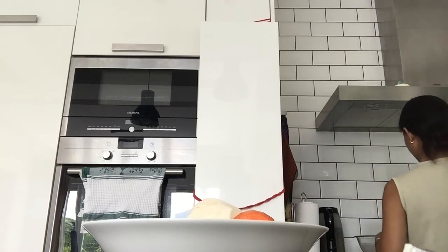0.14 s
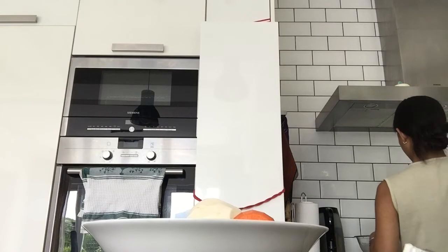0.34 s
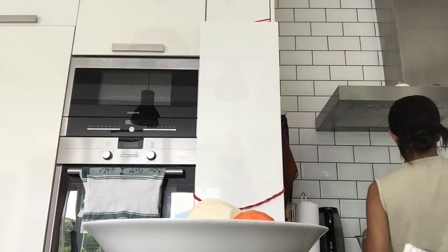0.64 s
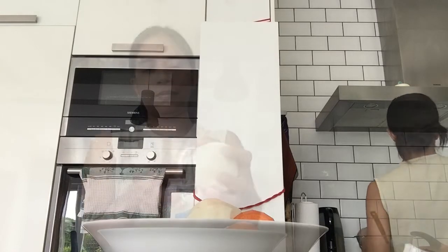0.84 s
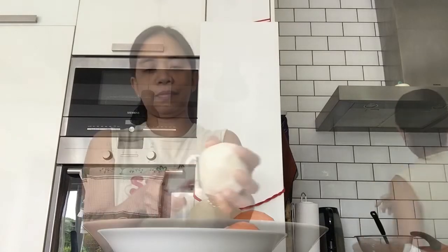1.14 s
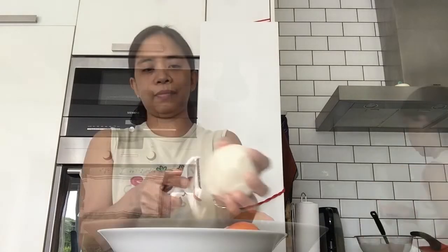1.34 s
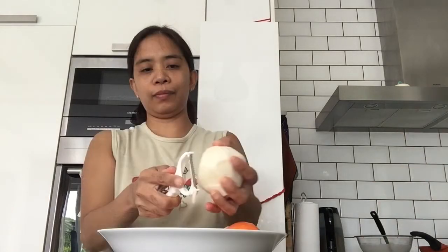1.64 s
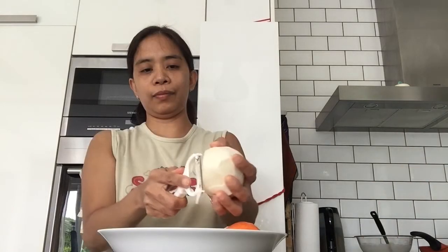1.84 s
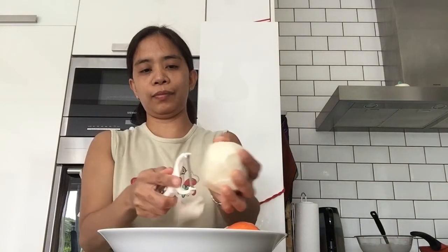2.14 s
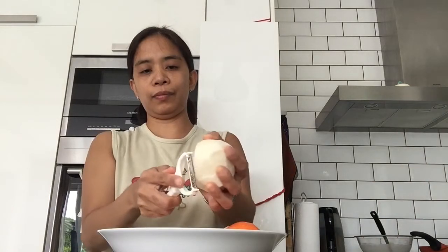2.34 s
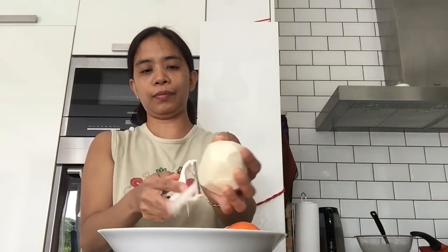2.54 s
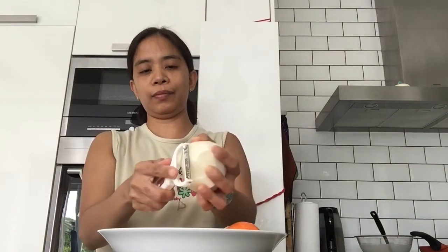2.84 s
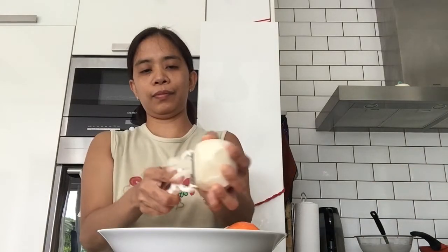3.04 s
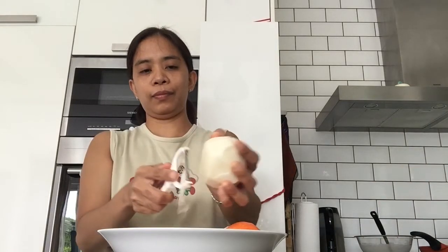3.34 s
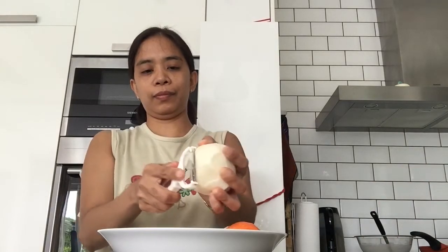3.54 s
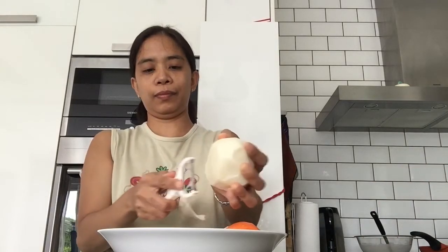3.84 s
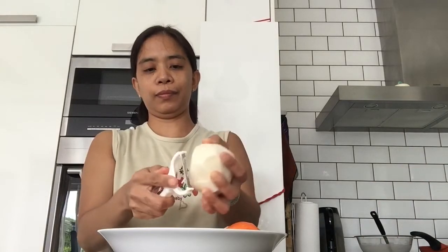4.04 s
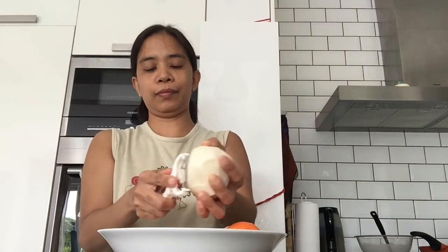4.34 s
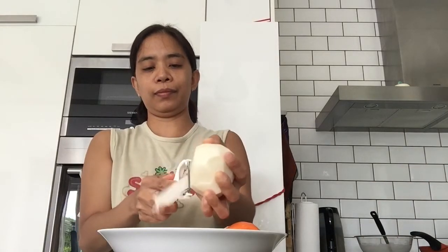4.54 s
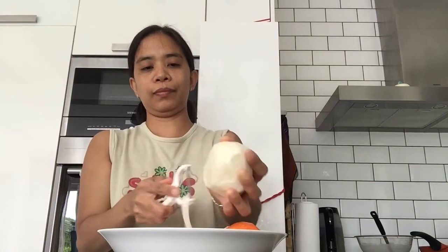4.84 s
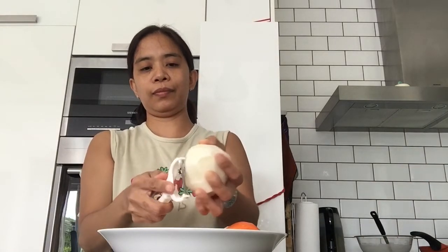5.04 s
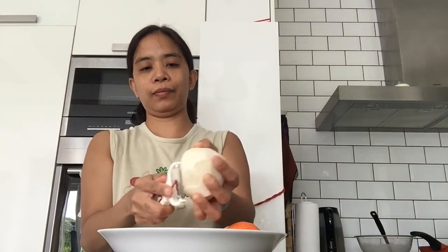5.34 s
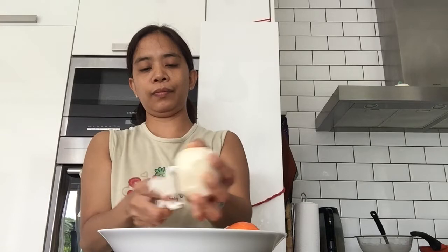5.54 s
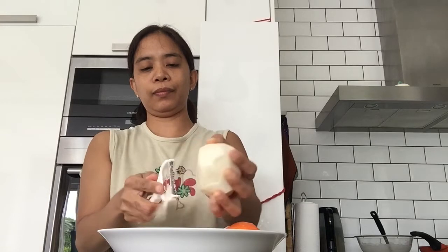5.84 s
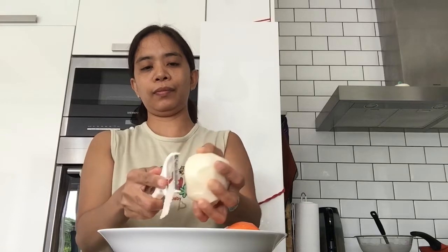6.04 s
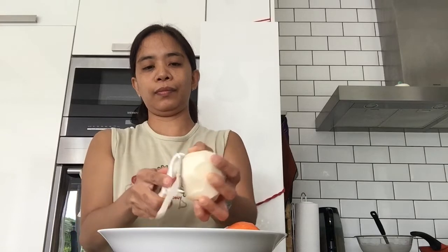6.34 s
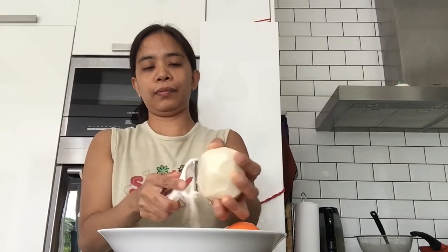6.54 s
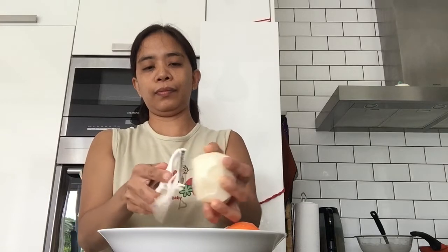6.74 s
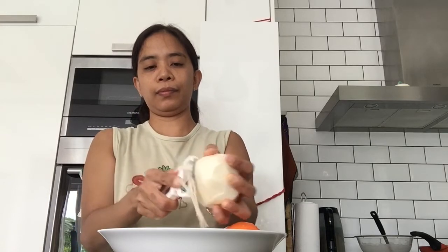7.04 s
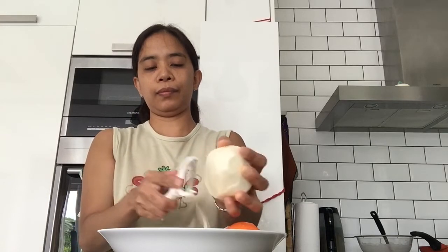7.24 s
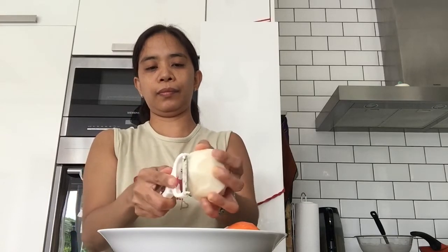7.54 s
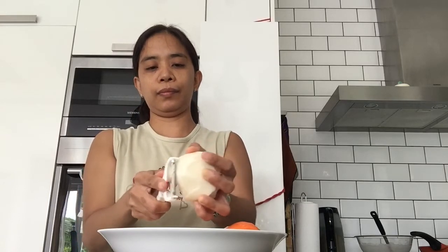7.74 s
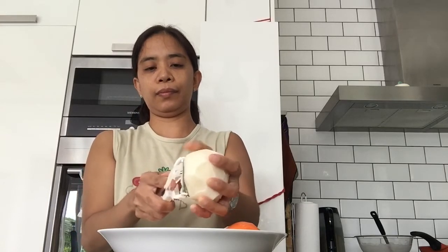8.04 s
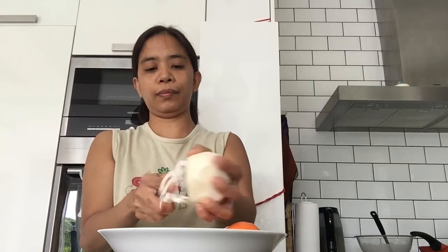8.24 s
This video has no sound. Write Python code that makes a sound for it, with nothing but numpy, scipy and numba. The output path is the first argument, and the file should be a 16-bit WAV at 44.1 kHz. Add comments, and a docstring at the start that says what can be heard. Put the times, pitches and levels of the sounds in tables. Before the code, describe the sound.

A quiet appliance hum with low drones and soft air noise runs throughout, its deep motor tone faint at first and fuller later. At about 0.25 s a pan is knocked at the far counter, a short dull clank with a ringing tail; near 0.77 s a pot gives a brighter double clatter, settling with a small bump by 0.93 s. From 1.1 s a swivel peeler works close by on a raw root vegetable over a bowl: two weaker scrapes, then fuller strokes around 1.8, 2.3, 3.0, 3.5, 4.2, 4.5, 5.2, 5.6, 6.4, 7.0, 7.8 and 8.3 s. Each is a crisp, wet, grainy rasp of about 0.1 to 0.3 s, coloured by the hollow hand. Sharp blade ticks precede many strokes, strongest at 1.8 s; a tiny metallic ring sounds near 3.4 s. Single close microphone, live tiled room, identical channels.

```python
"""Metal cookware is knocked twice at the far counter of a tiled kitchen: ringing modes over a dull clatter.
Then a swivel peeler takes short strokes off a raw root vegetable held over a bowl. The blade ticks (noise
bursts through resonances), then tears the wet flesh: random grains hiss and ring in the hollow of the hand.
An appliance hums throughout: a motor tone, filtered-noise drones and broad air noise."""
import sys
import numpy as np
from scipy import signal
from scipy.fft import rfft, irfft
from scipy.io import wavfile
from numba import njit

SR = 44100
rng = np.random.default_rng(int(sys.argv[2]) if len(sys.argv) > 2 else 0)


def ratio(d):
    """dB to gain"""
    e = np.asarray(d, float) / 20
    return 10 ** e


def dump(signal):
    """Clip the signal to [-1, 1] and save it as 16-bit WAV at the path in sys.argv[1]."""
    limited = np.clip(np.atleast_2d(signal).T, -1, 1)
    pcm = np.round(limited * 32767).astype(np.int16)
    wavfile.write(sys.argv[1], SR, pcm)


N = 369999

# Resonances that root and peeler frame add to the tearing.
# Each row: centre in Hz, width in Hz, relative level in dB.
BODY_PEAKS = [(1782, 870, -3.5), (3350, 1720, 2), (4050, 1390, 3.5), (6270, 1430, -1), (7734, 1440, -5),
              (9130, 1100, -9)]
# Treble resonances of the tearing.
# Each row: centre in Hz, width in Hz, relative level in dB.
SHEEN_PEAKS = [(11800, 3350, -4.5), (15150, 1940, -3)]
# The hands over the bowl.
# Each row: time in seconds, hollow in Hz, hollow over cutting in dB, bowl echo comb at the bite in Hz.
HAND_PATH = [(1.16, 1720, -6, 1370), (1.36, 1870, 2, 1360), (1.95, 1670, -6, 1260), (2.36, 1910, 3.5, 1294),
             (2.5, 1690, -6.5, 1230), (3.0, 1730, -11.5, 1310), (3.2, 1656, -5.5, 1340),
             (3.68, 1740, -11, 1250), (3.83, 1710, 0, 1320), (4.27, 1840, -3, 1300),
             (4.37, 1700, -5.5, 1300), (4.57, 1440, -20, 1440), (4.8, 1790, -12, 1420),
             (5.3, 1820, -22, 1300), (5.64, 1420, -13.5, 1420), (6.28, 1680, -10, 1425),
             (6.49, 1790, -7.5, 1350), (7.13, 1940, -14, 1237), (7.6, 2050, -4, 1330),
             (7.88, 1800, -13, 1350), (8.31, 1720, -22, 1480), (8.39, 1690, 6, 1450)]


def strokes():
    """The tearing drives body, hollow, rasp and sheen under the force of each stroke."""
    hollow_hz, hollow_db, _ = in_time(HAND_PATH)
    sharp_hz, settle_s = 158, 0.02   # the hollow starts sharp and settles as the grip closes
    hollow_hz = hollow_hz + sharp_hz * np.exp(-since_bite() / settle_s)
    hollow_width_hz = 110
    grains = tearing(per_s=6000, spread_db=1.0)

    uneven_db, uneven_hz = 1.1, 14.2   # uneven flesh: every body resonance swells and sinks on its own
    body = 0
    for k, peak in enumerate(BODY_PEAKS):
        swell = ratio(uneven_db * drift(uneven_hz))
        body = body + (-1) ** k * swell * resonances(grains, [peak])
    body = rms_one(body)
    rasp = rms_one(band(grains, 882, 1437))
    sheen = rms_one(resonances(grains, SHEEN_PEAKS))
    radius = np.exp(-np.pi * hollow_width_hz / SR)
    hollow = rms_one(gliding_resonance(grains, 2 * np.pi * hollow_hz / SR, radius))

    rasp_db = -16.5 - 0.46 * hollow_db   # over cutting; a looser cup lets more rasp out
    sheen_db = -5.5   # over cutting
    cutting = stroke_force(lift_db_per_s=600, grows_db_per_s=0) + skids()
    open_air = cutting * (body + ratio(rasp_db) * rasp + ratio(sheen_db) * sheen)
    # the hollow gains on the cutting along the stroke and outlasts it
    hollow_force = stroke_force(lift_db_per_s=235, grows_db_per_s=5)
    return open_air, hollow_force * ratio(hollow_db) * hollow


def tearing(per_s, spread_db):
    """Cells of the flesh burst at random, with exponential size spread in dB and a wavering strength."""
    sizes = ratio(spread_db * np.minimum(rng.exponential(1, N), 4)) * rng.choice([-1, 1], N)
    bursts = rng.random(N) < per_s / SR
    return sizes * bursts * ratio(0.5 * drift(50))


# Peeling strokes.
# Each row: bite in seconds, swell in seconds, fade in seconds, cutting at its height in dB,
# softening at the bite in dB.
PEEL_STROKES = [(1.083, 0.073, .09, -49, 10.5), (1.31, 0.024, .025, -55.5, 10),
                (1.803, .2, 0.082, -45, 8.5), (2.334, 0.16, 0.12, -45.5, 11.5),
                (2.918, 0.037, 0.019, -57.5, 13), (2.968, 0.073, 0.2, -44.5, 4),
                (3.514, 0.17, 0.15, -45, 13.5), (4.23, 0.1, 0.033, -48.5, 19.5),
                (4.503, 0.073, 0.047, -42.5, 9.5), (4.765, .03, 0.018, -48, 15),
                (5.19, .03, .021, -67.5, 0), (5.236, 0.083, 0.033, -49.5, 6), (5.567, 0.03, .13, -43, 10.5),
                (6.219, 0.069, 0.015, -52.5, 24), (6.389, 0.065, 0.14, -44, 7.5),
                (6.957, 0.21, 0.072, -48, 10.5), (7.543, 0.025, 0.1, -61, 1),
                (7.695, 0.014, .015, -57.5, 7), (7.828, 0.047, 0.066, -44.5, 5.5),
                (8.286, 0.036, 0.07, -44.5, 16)]


def stroke_force(lift_db_per_s, grows_db_per_s):
    """Each stroke leads in faintly, bites, swells to its height, fades and lifts off; a gain over time."""
    bite_db_per_s = 2500
    lead_in_db, lead_in_db_per_s = -15.5, 250   # a faint lead-in rises just before the bite: level under it, rise
    fade_db = 10.5   # loss before the lift
    t, power = np.arange(N) / SR, np.zeros(N)
    for s, swell_s, fade_s, db, soft_db in PEEL_STROKES:
        span = slice(int((s - .1) * SR), int((s + 1) * SR))
        u = t[span] - s
        early = np.minimum(u, 0)
        onset_db = np.maximum(bite_db_per_s * early, lead_in_db + lead_in_db_per_s * early)
        swell_db = -soft_db * np.clip(1 - u / swell_s, 0, 1) ** 2
        fading_db = -fade_db * np.clip((u - swell_s) / fade_s, 0, 1) ** 2
        growth_db = grows_db_per_s * (np.clip(u, 0, swell_s + fade_s) - swell_s)
        lift_db = -lift_db_per_s * np.maximum(u - swell_s - fade_s, 0)
        power[span] += ratio(2 * (db + onset_db + swell_db + fading_db + growth_db + lift_db))
    return np.sqrt(power)


def since_bite():
    """Seconds since the blade last bit, or since the start before the first bite."""
    t, bites = np.arange(N) / SR, np.array([0, *(row[0] for row in PEEL_STROKES)])
    return t - bites[np.searchsorted(bites, t, side="right") - 1]


# Blade ticks.
# Each row: time in seconds, level in dB, centre in Hz, sheen peak over the tick's own in dB.
BLADE_TICKS = [(1.6252, -46, 5530, -43), (1.7984, -36, 6870, -23), (1.804, -44, 2000, 0),
               (1.8088, -18, 6140, -16), (1.8204, -52, 7200, -24), (1.8226, -45, 7100, -19),
               (2.3381, -28.5, 3600, -25), (2.8887, -31.5, 3250, -5), (2.902, -38, 3300, -15),
               (3.411, -51, 8700, -12), (3.5009, -31.5, 3200, -15), (3.511, -30, 3740, -14),
               (3.8303, -40.5, 3730, -23), (4.149, -54.5, 3060, -26), (4.185, -56, 3300, -19),
               (5.1338, -41.5, 2800, -32), (5.1462, -42.5, 3300, -30), (5.1846, -54, 4360, -15),
               (5.475, -53, 4500, -5), (6.1807, -39.5, 2920, -22), (6.2035, -27, 4360, -10),
               (6.9054, -37.5, 2730, -29), (7.5205, -29.5, 2860, -25), (7.5353, -27.5, 4200, -6),
               (7.7097, -43, 2170, -17), (8.2003, -42.5, 2630, -39)]
# Peeler frame under a tick.
# Each row: centre in Hz, width in Hz, relative level in dB.
FRAME_PEAKS = [(1264, 63, -2), (3030, 124, 4.5), (3220, 70, 3.5), (4200, 570, -1), (5600, 450, -1.5),
               (7010, 220, 0)]


def ticks():
    """The blade snaps on its pivot: a few milliseconds of rattle, coloured by frame and body."""
    frame_db, body_db = -2.5, -10   # under each tick's own colour
    rise_s, decay_s = 0.00086, 0.00054
    out, t = np.zeros(N), np.arange(600) / SR
    noise = rng.standard_normal((len(BLADE_TICKS), 600))
    for (s, db, hz, sheen_db), snap in zip(BLADE_TICKS, noise):
        snap = snap * np.exp(-t / decay_s) * np.minimum(t / rise_s, 1)
        tick = resonances(snap, [(hz, 900, 0.0)])
        tick = tick + ratio(frame_db) * resonances(snap, FRAME_PEAKS)
        tick = tick + ratio(body_db) * resonances(snap, BODY_PEAKS)
        sheen = resonances(snap, SHEEN_PEAKS)
        tick = tick / np.abs(tick).max() + ratio(sheen_db) * sheen / np.abs(sheen).max()
        at = int(s * SR)
        out[at:at + 600] += ratio(db) * tick
    return out


def skids():
    """The blade slides briefly after each tick; a gain over time that decays exponentially."""
    skid_db, fall_db_per_s = -26, 600   # level over the tick's, fall
    kicks = np.full(N, 1e-18)
    for s, db, *_ in BLADE_TICKS:
        kicks[int(s * SR)] = ratio(db + skid_db)
    return signal.lfilter([1], [1, -ratio(-fall_db_per_s / SR)], kicks)


# Modes of the loose blade.
# Each row: pitch in Hz, relative level in dB, t60 in seconds.
BLADE_MODES = [(2075, -3, .6), (2853, -2, .6), (8790, 2, .06), (9545, 2, .08)]
# Taps on the loose blade.
# Each row: time in seconds, relative level in dB.
LOOSE_TAPS = [(3.407, -65.5), (7.55, -77)]


def loose_blade():
    """The tapped blade rings in a few decaying modes."""
    return struck(BLADE_MODES, LOOSE_TAPS, split=0.00074)


def bowl_echo(x):
    """Sound bounces between bowl and hands: two band-limited copies, one and two path lengths late."""
    echo_share, second_share = 0.52, 0.35
    widen_hz_per_s = 1190   # the comb widens as the blade travels down
    comb_hz = in_time(HAND_PATH)[2] + widen_hz_per_s * np.minimum(since_bite(), .4)
    lag, clock = SR / comb_hz, np.arange(N)
    once = echo_share * band(np.interp(clock - lag, clock, x), 460, 5900)
    return x + once + second_share * np.interp(clock - lag, clock, once)


# Modes of the pan.
# Each row: pitch in Hz, relative level in dB, t60 in seconds.
PAN_MODES = [(282, -9.5, 0.28), (410, -10, 0.13), (716, 6, 0.07), (870, -1, 0.1), (1407, -15.5, 0.51),
             (1841, -34, 0.17), (2470, -3, 0.1), (2450, -22, 0.52), (2620, -11, 0.27), (2930, -7.5, 0.11),
             (3470, -18, 0.12), (3790, -8.5, 0.036)]
# Contacts on the pan.
# Each row: time in seconds, relative level in dB.
PAN_HITS = [(0.2551, -43), (.2655, -77), (.33, -60)]
# Spectrum of the pan's damped modes.
# Each row: frequency in Hz, relative level in dB per Hz.
PAN_SPECTRUM = [(150, -12), (700, 4), (1200, -9), (2500, -10.5), (4200, -11.5), (5500, -29), (8000, -48)]
# Modes of the pot.
# Each row: pitch in Hz, relative level in dB, t60 in seconds.
POT_MODES = [(351.7, -4, 0.49), (698, -3.5, 0.14), (844, -3, 0.2), (1234, -5, 0.11), (1430, -2, 0.24),
             (1640, -5, 0.19), (1900, -33, 0.36), (2610, -21, 0.28), (3250, -6.5, 0.12), (4050, -5, 0.11),
             (4120, -12.5, 0.24), (4387, -18, 0.13), (4500, -11.5, 0.16), (5030, -18, 0.18),
             (5820, -5.5, 0.17), (7800, -17, 0.15), (8960, -12, 0.078), (9400, -9, 0.081),
             (10140, -15, 0.14), (11530, -18, 0.17), (11800, -23, 0.16), (13470, -24, 0.15)]
# Contacts on the pot.
# Each row: time in seconds, relative level in dB.
POT_HITS = [(0.7644, -47.5), (0.782, -50.5), (.845, -63), (0.886, -64), (0.93, -69)]
# Spectrum of the pot's damped modes.
# Each row: frequency in Hz, relative level in dB per Hz.
POT_SPECTRUM = [(150, -8), (500, -2), (1400, 5.5), (3000, -6), (5500, -6), (9000, -28), (12500, -12),
                (15000, -41)]
# A dull bump as the pot settles.
# Each row: time in seconds, relative level in dB.
POT_BUMPS = [(.928, -37)]


def cookware():
    """Ringing modes over the dull noise of many damped ones."""
    thud = coloured(rattle(PAN_HITS, 0.012), PAN_SPECTRUM)
    pan = struck(PAN_MODES, PAN_HITS, split=0.01) + ratio(34.0) * thud
    clatter = coloured(rattle(POT_HITS, 0.02), POT_SPECTRUM)
    pot = struck(POT_MODES, POT_HITS, split=0.0029) + ratio(32.5) * clatter
    bump = band(rattle(POT_BUMPS, 0.0063), 230, 630)
    return pan + pot + ratio(19) * bump


def struck(modes, knocks, split):
    """Every mode is a close pair that beats; each knock meets it in a phase of its own."""
    s, knock_db = np.transpose(knocks)
    out = 0
    for hz, db, t60_s in modes:
        for pitch_hz in hz * (1 - split), hz * (1 + split):
            clicks = np.full(N, 1e-18)
            at = (s * SR + rng.random(len(s)) * SR / hz).astype(int)
            clicks[at] = ratio(knock_db + db - 5.0)
            r, w = ratio(-60 / (t60_s * SR)), 2 * np.pi * pitch_hz / SR
            out = out + signal.lfilter([0, np.sin(w)], [1, -2 * r * np.cos(w), r * r], clicks)
    return out


def rattle(knocks, decay_s):
    """A knock is a short scatter of contacts that dies away."""
    t = np.arange(4000) / SR
    scatter = rng.standard_normal((len(knocks), 4000)) * np.exp(-t / decay_s)
    out = np.full(N, 1e-18)
    for (s, db), burst in zip(knocks, scatter):
        at = int(s * SR)
        out[at:at + 4000] += ratio(db) * burst / np.sqrt(np.sum(burst ** 2))
    return out


# Levels of the low drones: the motor tone is faint for the first second and louder after. Each row: time in
# seconds, motor tone in dB, second-order drone in dB, cabinet drone in dB.
APPLIANCE_LEVELS = [(0.0, -75, -67, -70), (0.89, -78, -65.5, -65.5), (1.24, -67, -69.5, -66),
                    (1.94, -62, -65.5, -59), (2.71, -66, -67.5, -60), (3.62, -60, -65.5, -60),
                    (4.3, -65, -69, -61), (4.55, -66, -79, -58), (5.12, -59.5, -65.5, -64),
                    (5.93, -59, -65.5, -58.5), (7.12, -57, -66, -61.5), (8.39, -60.5, -63.5, -59.5)]
# Cabinet resonances.
# Each row: centre in Hz, width in Hz, relative level in dB.
CABINET_PEAKS = [(70, 12, -4.5), (134.8, 9, 0.5), (168.4, 9.5, 1.5), (205.5, 28.6, -10.5)]
# Air resonances of the duct.
# Each row: centre in Hz, width in Hz, gain on unit noise in dB.
DUCT_PEAKS = [(347.6, 19.2, -45.5), (534, 23, -51)]
# Spectrum of the air noise; the first row is not used.
# Each row: frequency in Hz, relative level in dB per Hz.
AIR_SPECTRUM = [(130, -33), (220, -6), (254, 2.5), (344, 2), (404, -3.5), (435, -2.5), (558, -9.5),
                (680, -6.5), (1270, -12), (6850, -19), (15900, -27.5)]


def appliance():
    """A motor tone, its second order as narrow noise, cabinet and duct resonances and broad air noise."""
    motor_hz = 49
    air_db = -72   # within 274 to 640 Hz
    tone_db, second_db, cabinet_db = in_time(APPLIANCE_LEVELS)
    cabinet_db = cabinet_db + 2.83 * drift(2.34)
    tone_hz = motor_hz * (1 + 0.0031 * drift(2.5))
    tone = np.sqrt(2) * np.sin(2 * np.pi * np.cumsum(tone_hz) / SR)

    shaking = rng.standard_normal(N + SR)   # the first second lets the filters settle
    second = resonances(shaking, [(2 * motor_hz, 9, 0)])
    second = rms_one(resonances(second, [(2 * motor_hz, 14, 0)])[SR:])
    cabinet = resonances(shaking, CABINET_PEAKS)
    high_pass = signal.butter(4, 62, "high", fs=SR, output="sos")
    cabinet = rms_one(signal.sosfilt(high_pass, cabinet)[SR:])
    duct = resonances(shaking, DUCT_PEAKS)[SR:]

    air = coloured(rng.standard_normal(N), [(60, -50), *AIR_SPECTRUM[1:]])
    air = air / np.std(band(air, 274, 640))
    drones = ratio(tone_db) * tone + ratio(second_db) * second + ratio(cabinet_db) * cabinet
    return drones + duct + ratio(air_db) * air


# Reverberation of the kitchen.
# Each row: frequency in Hz, t60 in seconds.
KITCHEN_T60 = [(150, 0.33), (600, 0.26), (2000, 0.4), (5000, 0.27), (10000, 0.42), (15000, 0.26)]


def kitchen(x):
    """Dense reflections from tile and steel: noise bands, each with its own decay."""
    t, tail = np.arange(SR // 2) / SR, 0
    edges_hz = 80 * 2. ** np.arange(9)
    for low_hz, high_hz in zip(edges_hz, edges_hz[1:]):
        decay = ratio(-60 * t / at_hz(KITCHEN_T60, np.sqrt(low_hz * high_hz)))
        noise = band(rng.standard_normal(len(t)), low_hz, high_hz)
        piece = noise * decay * np.minimum(t / 0.0013, 1)
        tail = tail + piece / np.sqrt(np.sum(decay ** 2))
    return signal.fftconvolve(x, tail)[:N]


def rms_one(x):
    """Scales to an rms of 1."""
    return x / np.sqrt(np.mean(x ** 2) + 1e-20)


def in_time(rows):
    """Interpolates table columns linearly over every sample."""
    s, *columns = np.transpose(rows)
    return [np.interp(np.arange(N) / SR, s, c) for c in columns]


def at_hz(points, hz):
    """Interpolates a table over log frequency."""
    points_hz, values = np.array(points)[:, 0], np.array(points)[:, 1]
    return np.interp(np.log(hz), np.log(points_hz), values)


def band(x, low_hz, high_hz):
    """Butterworth band-pass."""
    edges_hz = [low_hz, min(high_hz, .45 * SR)]
    return signal.sosfilt(signal.butter(2, edges_hz, "band", fs=SR, output="sos"), x)


def drift(rate_hz):
    """Slow chance with spread 1: noise through a double low-pass."""
    r = np.exp(-2 * np.pi * rate_hz / SR)
    noise = rng.standard_normal(N + SR)
    return rms_one(signal.lfilter([1], [1, -2 * r, r * r], noise)[SR:])


def resonances(x, peaks):
    """Parallel resonances with alternating signs."""
    out = 0
    for k, (hz, width_hz, db) in enumerate(peaks):
        r = np.exp(-np.pi * width_hz / SR)
        b = np.array([1, 0, -1]) * (1 - r * r) / 2
        a = [1, -2 * r * np.cos(2 * np.pi * hz / SR), r * r]
        out = out + (-1) ** k * ratio(db) * signal.lfilter(b, a, x)
    return out


@njit
def gliding_resonance(x, turn, r):
    """A resonance whose centre (radians per sample) moves."""
    y = np.zeros_like(x)
    for i in range(2, len(x)):
        y[i] = x[i] - x[i - 2] + 2 * r * np.cos(turn[i]) * y[i - 1] - r * r * y[i - 2]
    return y


def coloured(x, spectrum):
    """Shapes a signal by a spectrum in dB per Hz."""
    hz = np.maximum(np.fft.rfftfreq(N, 1 / SR), 1)
    return irfft(rfft(x) * ratio(at_hz(spectrum, hz)), N)


def scene():
    """Peeling close by, cookware far off, both in the kitchen's reverberation, over the appliance."""
    near_room_db, far_room_db, far_direct_db = -10, 7, -1
    open_air, hollow = strokes()
    near = bowl_echo(open_air + ticks()) + hollow + loose_blade()
    far = cookware()
    wet = kitchen(ratio(near_room_db) * near + ratio(far_room_db) * far)
    return np.tile(near + ratio(far_direct_db) * far + wet + appliance(), (2, 1))


# Dips from the microphone housing.
# Each row: centre in Hz, width in Hz, share removed.
HOUSING_DIPS = [(4860, 810, 0.072), (10620, 820, 0.45)]


def band_limit(x):
    """A steep low-pass at the top of the band."""
    return signal.sosfilt(signal.butter(12, 16980, fs=SR, output="sos"), x)


def record(dry):
    """One microphone on both channels, with two dips from its housing and the top cut off."""
    cutoff_hz = 16100
    for hz, width_hz, share in HOUSING_DIPS:
        dry = dry - share * resonances(dry, [(hz, width_hz, 0)])
    low_pass = signal.cheby2(14, 45, cutoff_hz, fs=SR, output="sos")
    return band_limit(signal.sosfilt(low_pass, dry))


dry = scene()
out = record(dry)
dump(out)
```